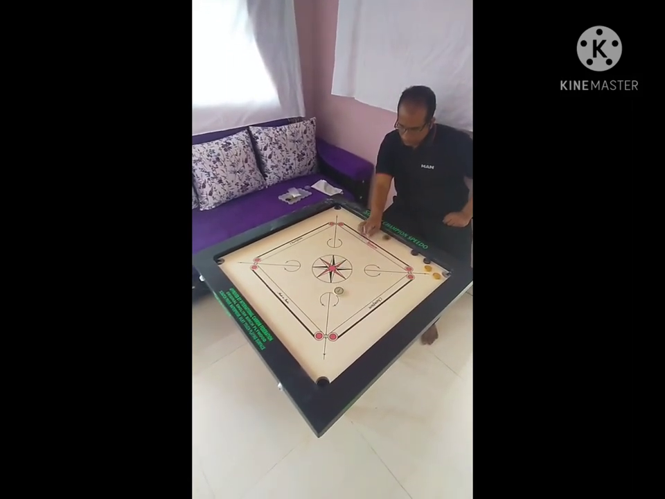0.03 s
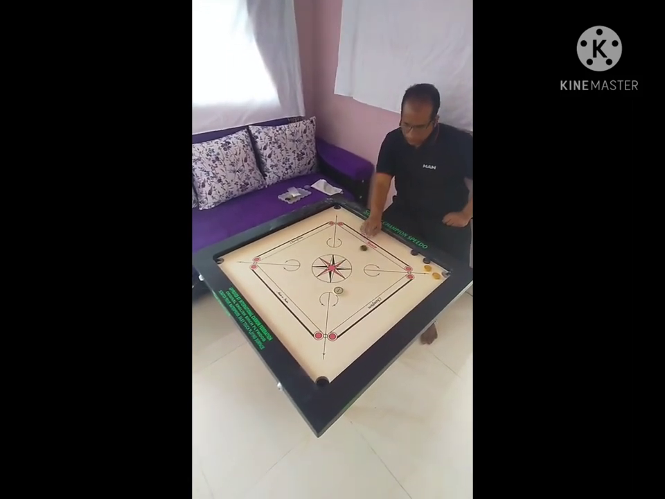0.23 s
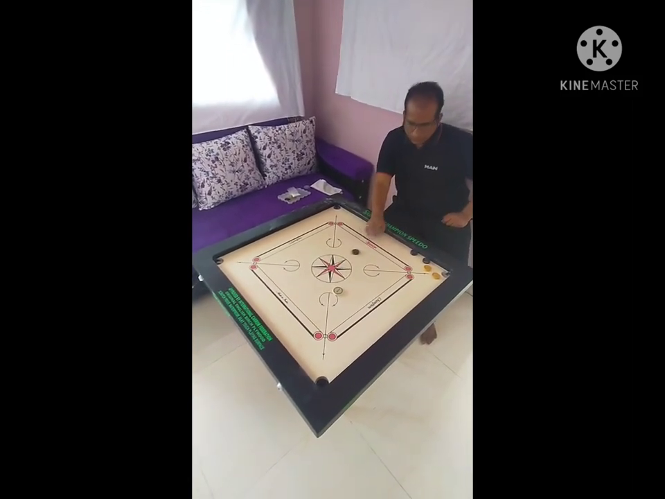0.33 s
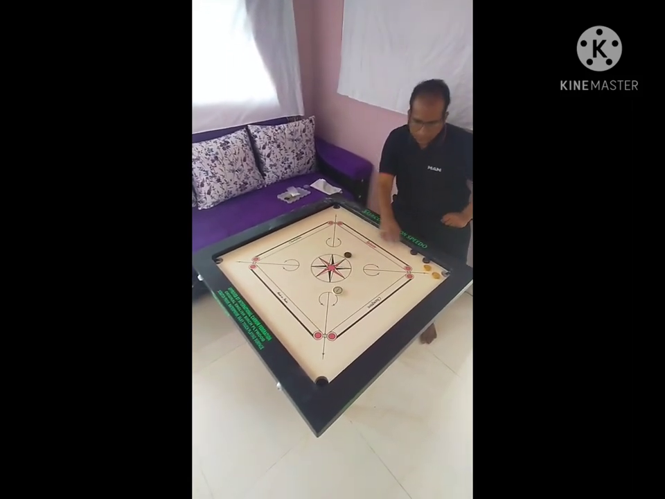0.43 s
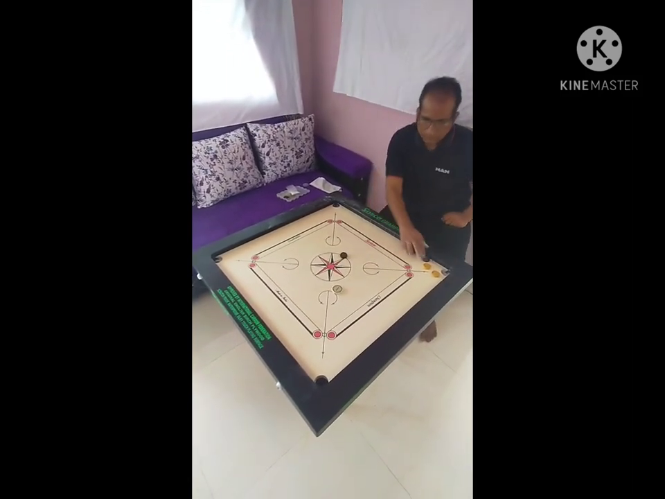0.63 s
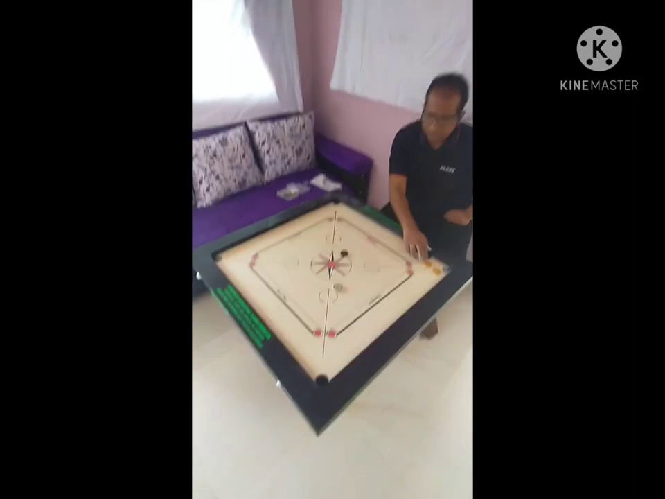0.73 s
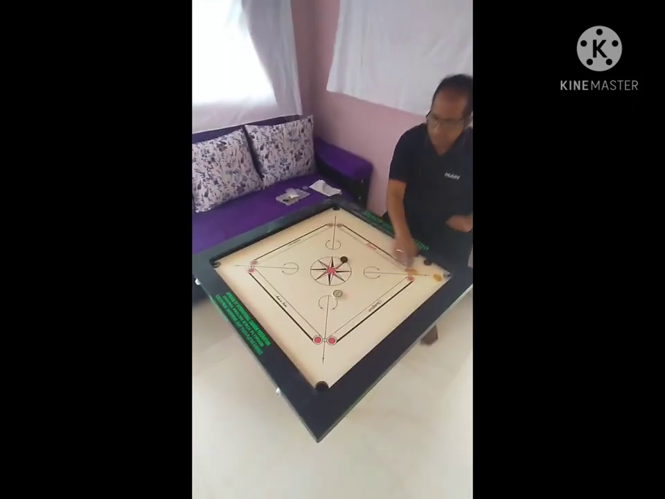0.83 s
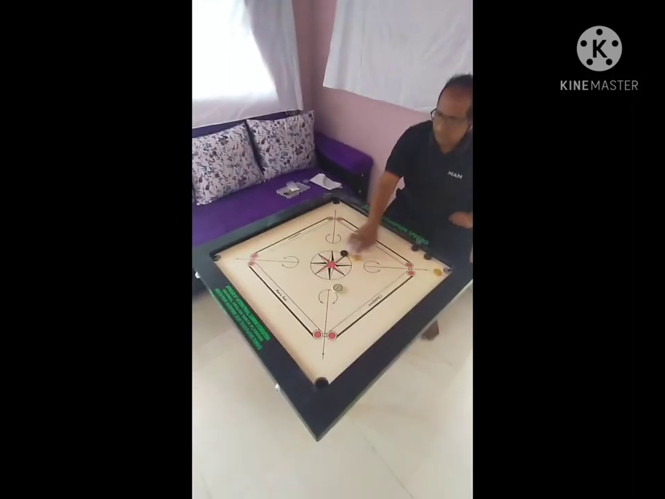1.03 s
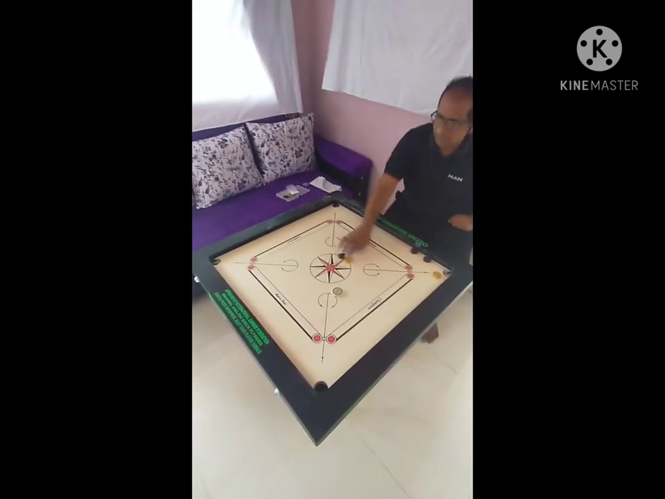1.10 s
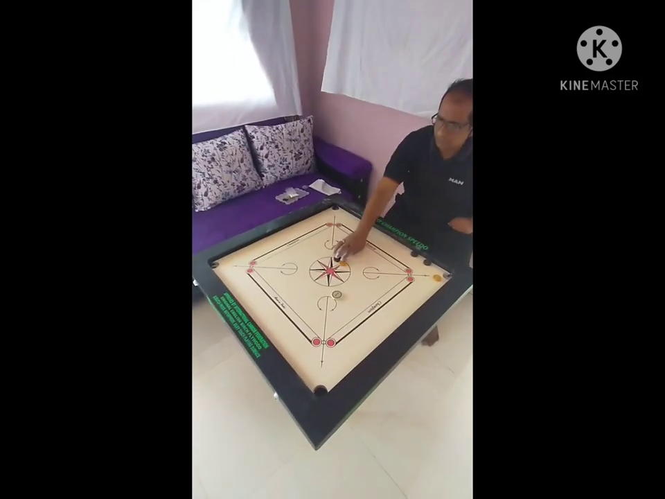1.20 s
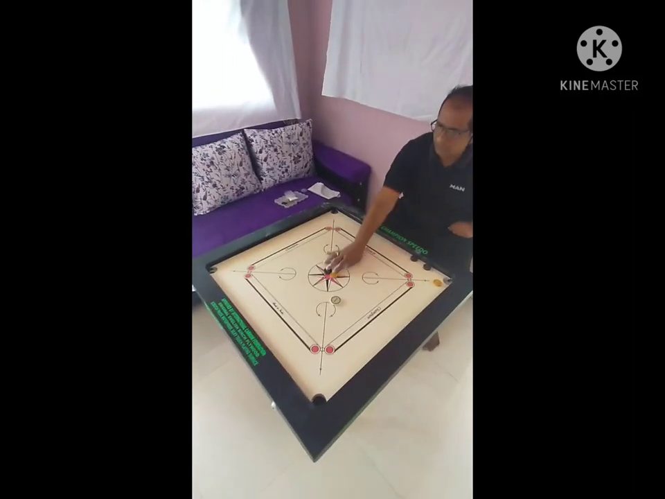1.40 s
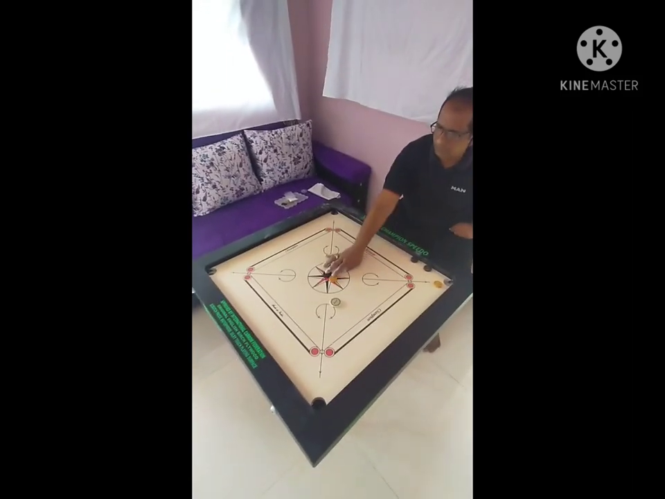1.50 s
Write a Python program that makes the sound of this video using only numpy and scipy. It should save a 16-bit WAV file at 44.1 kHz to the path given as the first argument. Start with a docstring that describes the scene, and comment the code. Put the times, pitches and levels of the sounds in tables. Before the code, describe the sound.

Sharp clacks and three woody knocks as a flicked striker rebounds around a carrom board.

```python
"""A striker, flicked across a wooden carrom board, rebounds from the frame three times.
Each impact excites the damped modes of frame and bed. Discs collide with bright clacks, tap the
plywood bed and hiss by sliding friction; soft pushes make the board thud, and at the end a hand
comes down on a piece. A small hard-walled room reverberates. Heard in mono from a step away."""
import sys
import numpy as np
from scipy import signal
from scipy.fft import rfft, irfft
from scipy.io import wavfile
from scipy.ndimage import uniform_filter1d

SR = 44100
rng = np.random.default_rng(int(sys.argv[2]) if len(sys.argv) > 2 else 0)


def dump(signal):
    """Clip the signal to [-1, 1] and save it as 16-bit WAV at the path in sys.argv[1]."""
    limited = np.clip(np.atleast_2d(signal).T, -1, 1)
    pcm = np.round(limited * 32767).astype(np.int16)
    wavfile.write(sys.argv[1], SR, pcm)


N = 68355
T = np.arange(N) / SR
HZ = np.maximum(np.arange(N + 1) * SR / (2 * N), 1)   # frequency grid
BODY_HZ = 1114   # upper edge of the wood's low body


def frame_knocks():
    """Impact excitation: the striker gives a woody blow, a crack and a quick rebound; modes ring on."""
    # Each row: start in seconds, level in dB, rebound delay in seconds, rebound in dB, favoured band in
    # Hz, body, crack and ringing in dB, decay time factor, favoured ring in Hz, room in dB.
    knocks = [(0.3903, 7, 0.0025, 2, 2180, -2, -13.5, 2, 1.05, 1420, 5),
              (0.5908, -0.5, 0.002994, 5.5, 2800, -5.5, -13, 1, 1.23, 794, 6.5),
              (0.8219, 5, 0.0023, -3, 1570, -1.5, -17, 3.5, 0.65, 965, 7)]
    # The woody blow as heard. Each row: frequency in Hz, relative level in dB.
    wood_spectrum = [(40, -61), (120, -15), (300, -17.5), (550, -17), (800, -10), (1100, -6.5), (1320, 3.5),
                     (1600, -1), (2000, -0.5), (2450, -1.5), (2850, -5), (3400, -5.5), (4000, -27.5),
                     (6000, -40.5), (16000, -79)]
    # The crack as heard, with the microphone's lift near 15 kHz. Each row: frequency in Hz, level in dB.
    crack_spectrum = [(500, -4), (3000, 3), (5000, -1), (6500, -4), (8300, -1.5), (9800, -11),
                      (11500, -13.5), (13300, -24), (15400, -19), (17000, -50)]
    favour_db, modes_db = 2, -9.5
    out = np.zeros(N)
    for (start, db, rebound_s, rebound_db, favoured_hz, body_db, crack_db,
         ringing_db, decay_factor, ring_hz, room_db) in knocks:
        colour = favour_db * favoured_band(HZ, favoured_hz) + body_db * (HZ < BODY_HZ)
        wood = click(at_hz(wood_spectrum) + colour)
        crack = from_db(crack_db) * click(at_hz(crack_spectrum))
        blow = wood + through_board(crack)
        rebound = from_db(rebound_db)
        contacts = blow + rebound * delayed(blow, rebound_s)
        room = reflections(wood + crack, room_db)
        ringing = from_db(modes_db + ringing_db) * board_ring(decay_factor, ring_hz)
        aftersound = np.hypot(1, rebound) * (room + ringing)   # the two contacts add in energy
        out += from_db(db) * delayed(contacts + aftersound, start)
    return out


def board_ring(decay_factor, favoured_hz):
    """Modal superposition: each knock favours some modes and has its own ring length."""
    # Modes of frame and bed. Each row: frequency in Hz, relative level in dB, base t60 in seconds.
    modes = [(487, -15.5, 0.5), (670.5, -5.5, 0.36), (757.3, -14.5, 1), (862.5, -9.5, 0.36),
             (930.5, -10.5, 0.33), (1057, -9.5, 0.55), (1150, -19, 0.52), (1218, 0.5, 0.31),
             (1225, -14.5, 0.25), (1434, -4.5, 0.1), (1446, 2.5, 0.37), (1696, -6, 0.53), (1782, -3, 0.1),
             (1931, -7.5, 0.53), (2010, -1.5, 0.39), (2090, -3.5, 0.45), (2240, -6.5, 0.35),
             (2516, -0.5, 0.067), (2690, -14, 0.13), (3285, -15, 0.67)]
    favour_db, swell_cycles = 3, 9.6
    out = np.zeros(N)
    for k, (hz, db, t60) in enumerate(modes):
        gain = from_db(db + favour_db * favoured_band(hz, favoured_hz) + rng.normal(scale=1))
        swell = 1 - np.exp(-T * hz / swell_cycles)   # low modes take longer to build up
        out += (-1) ** k * gain * unit(swell * ring(hz, t60 * decay_factor))
    return out


def favoured_band(hz, centre_hz, width_octaves=0.17):
    """Selective excitation: each knock favours one band, a bell curve in log frequency."""
    return np.exp(-(np.log2(hz / centre_hz) / width_octaves) ** 2)


def through_board(contact, decay_s=0.0034, spread_db=3.5):
    """Multiple reflection: waves running to and fro in the board smear a contact over milliseconds."""
    t = T[:SR // 40]
    response = unit(rng.standard_normal(len(t)) * np.exp(-t / decay_s))
    spread = from_db(spread_db)
    return (contact + spread * signal.fftconvolve(contact, response)[:N]) / np.hypot(1, spread)


def disc_clacks():
    """Hard collision: discs meet with a bright click, thinner when glancing, and a short high ring."""
    # Each row: start in seconds, level in dB, thinning corner in Hz, ring frequency in Hz,
    # ring level in dB, ring t60 in seconds, the click's room level in dB.
    clacks = [(0.15, -26, 7700, 8200, -4.5, 0.0043, -5), (0.2255, -16, 5400, 6600, 8.5, 0.006, -11),
              (0.2279, -5.5, 3430, 7740, -2, 0.014, 6.5), (0.2334, -1, 3500, 10750, -16.5, 0.058, 2),
              (0.3141, -11, 3500, 9150, -11, 0.017, 2.5), (0.387, -25, 4070, 6500, -11, 0.0067, 10),
              (0.3916, -16, 4570, 5070, 9.5, 0.0071, 21.5), (0.3929, -12.5, 7100, 8050, 8, 0.0041, 13.5),
              (0.7852, -17.5, 5960, 8550, 9.5, 0.016, 9), (0.7966, -10.5, 5570, 8720, 4, 0.025, 13),
              (0.822, -1, 3500, 6060, -21, .005, -3.5)]
    # The click as heard, with the microphone's lift near 15 kHz. Each row: frequency in Hz, level in dB.
    click_spectrum = [(400, -5), (2000, 14), (3600, 8), (4600, -0.5), (6500, 3.5), (8500, 3), (9800, -4),
                      (12500, -18.5), (15400, -8.5), (17000, 3)]
    thinning_db_per_octave = 23
    out = np.zeros(N)
    for start, db, thin_hz, ring_hz, ring_db, t60, room_db in clacks:
        thinning = thinning_db_per_octave * np.log2(np.clip(HZ / thin_hz, .1, 1))
        contact = click(at_hz(click_spectrum) + thinning)
        clack = through_board(contact) + reflections(contact, room_db)
        ping = from_db(ring_db) * ring(ring_hz, t60)
        out += from_db(db) * delayed(clack + ping + reflections(ping, room_db=-1.5), start)
    return out


def bed_taps():
    """Contact low-pass filtering: discs tap the plywood bed, and a soft touch loses its treble."""
    # Each row: start in seconds, level in dB, tilt in dB per octave, softening corner in Hz, room in dB.
    taps = [(0.1480, -8, -2.5, 2520, 3), (0.2271, 2, -0.5, 8000, 1), (0.2332, 0.5, 1.5, 7940, -3),
            (0.2754, 0, 7.5, 1610, 0.5), (0.3139, -3, 2.5, 3780, 2), (0.4620, 2.5, 9.5, 1520, -7),
            (0.471, 0.5, 9, 1470, -0.5), (0.786, -15, 2, 3000, 6.5), (1.083, -32.5, 5.5, 2560, 13),
            (1.3642, -19, 4.5, 4900, 9), (1.3744, -11.5, -6.5, 4030, 2)]
    # A tap on the bed as heard. Each row: frequency in Hz, relative level in dB.
    bed_spectrum = [(100, -12), (300, -1.5), (700, 3.5), (1050, 5.5), (1400, 9.5), (1750, 3), (2400, 3.5),
                    (3300, -5), (4200, -23), (8000, -15), (13000, -32.5), (16000, -41)]
    softening_db_per_octave = -7.5
    out = np.zeros(N)
    for start, db, slope, soft_hz, room_db in taps:
        tilt = slope * np.log2(np.maximum(HZ / BODY_HZ, .5))
        softening = softening_db_per_octave * np.log2(np.maximum(HZ / soft_hz, 1))
        contact = click(at_hz(bed_spectrum) + tilt + softening)
        out += from_db(db) * delayed(through_board(contact) + reflections(contact, room_db), start)
    return out


def board_thuds(attack_s=.005):
    """Damped free vibration: soft pushes set the whole board and its stand booming briefly."""
    # Each row: start in seconds, level in dB, frequency in Hz, t60 in seconds.
    thuds = [(0.000, -14, 122, 0.031), (0.17, -6, 103, 0.041), (0.242, -0.5, 148.6, 0.14),
             (0.284, -1, 142, .2), (0.307, -11, 83, 0.19), (0.496, -5, 124.6, 0.11),
             (0.545, -4.5, 92.5, 0.14), (0.600, -8, 99, 0.12), (0.672, 3, 118, 0.029),
             (0.717, -6, 117, 0.13), (0.762, -8.5, 97, 0.074), (0.893, -8.5, 117, 0.094),
             (1.084, -13.5, 105, 0.05), (1.236, -18, 90, 0.13), (1.279, -15, 118, 0.059),
             (1.362, -6.5, 157, 0.046), (1.404, -11, 96, 0.048), (1.457, -10, 114, 0.023),
             (1.526, -12, 155, 0.095)]
    swell = 1 - np.exp(-T / attack_s)
    out = np.zeros(N)
    for start, db, hz, t60 in thuds:
        boom = unit(swell * ring(hz, t60))
        out += from_db(db) * delayed(boom + reflections(boom, room_db=-5), start)
    return out


def sliding(sing_hz=8960, bandwidth_hz=160, sing_db=-11):
    """Friction noise: discs and hand hiss on the powdered bed, and a disc resonance sings faintly."""
    # Envelope of the sliding. Each row: time in seconds, level in dB.
    levels = [(0, -70), (0.2, -70), (0.3, -51), (0.75, -52), (0.95, -70), (1.06, -68), (1.12, -61.5),
              (1.35, -61.5), (1.43, -60.5), (1.55, -51)]
    # The hiss as heard, with the microphone's lift near 15 kHz.
    # Each row: frequency in Hz, relative spectral density in dB.
    hiss_spectrum = [(500, 19), (3000, 5), (4500, -6), (6200, -2.5), (8000, 4), (9000, -1), (9800, 2),
                     (11500, 0), (13000, -11), (15300, 7), (17000, -23)]
    resonance = signal.iirpeak(sing_hz, sing_hz / bandwidth_hz, fs=SR)
    singing = signal.lfilter(*resonance, rng.standard_normal(N))
    envelope = from_db(np.interp(T, *np.transpose(levels)))
    return envelope * (noise(hiss_spectrum) + from_db(sing_db) * singing / singing.std())


def reflections(x, room_db, gap_s=0.00083, build_s=.005):
    """Reverberation: convolution with a fresh, uneven noise tail that dies away band by band."""
    # Decay of the room. Each row: band centre in Hz, t60 in seconds.
    decays = [(120, 0.43), (500, 0.36), (1400, .32), (2800, 0.27), (5500, .32), (9000, 0.27), (15000, 0.27)]
    size = SR // 2
    t, hz = T[:size], np.maximum(np.fft.rfftfreq(size, 1 / SR), 1)
    white = rfft(rng.standard_normal(size))
    centres, t60s = np.transpose(decays)
    tail = np.zeros(size)
    for share, t60 in zip(np.eye(len(centres)), t60s):
        band = irfft(white * at_hz(list(zip(centres, share)), hz), size)
        tail += band * np.exp(-np.log(1000) * t / t60)
    clumps = uniform_filter1d(rng.standard_normal(size), size=90)
    unevenness = from_db(clumps / clumps.std())   # 1 dB rms
    build_up = 1 - np.exp(-np.maximum(t - gap_s, 0) / build_s)
    return from_db(room_db) * signal.fftconvolve(x, unit(tail * unevenness * build_up))[:N]


def room_noise(level_db=-46.5):
    """Stationary noise: a faint, low background fills the room."""
    # Each row: frequency in Hz, relative spectral density in dB.
    room_spectrum = [(25, -32), (50, -11), (90, -0.5), (160, 4), (300, 3.5), (700, -3.5), (1300, -7.5),
                     (2300, -16), (3200, -20), (4300, -43), (6000, -27.5), (9000, -50), (12800, -50),
                     (15300, -28)]
    return from_db(level_db) * noise(room_spectrum)


def click(db):
    """Minimum phase: the shortest causal click with this spectral shape, at unit energy."""
    cepstrum = irfft(db * np.log(10) / 20)[:N]
    cepstrum[0] = 0
    return unit(irfft(np.exp(rfft(2 * cepstrum, 2 * N)))[:N])


def ring(hz, t60):
    """Damped oscillator: a sine of unit energy that falls 60 dB in t60 seconds."""
    return unit(np.sin(2 * np.pi * hz * T) * np.exp(-np.log(1000) * T / t60))


def noise(spectrum):
    """Spectral shaping: white noise takes on this colour, at an rms of one."""
    white = rfft(rng.standard_normal(2 * N))
    coloured = irfft(white * from_db(at_hz(spectrum)))[:N]
    return coloured / coloured.std()


def at_hz(points, hz=HZ):
    """Linear interpolation of a table on a log-frequency axis."""
    frequencies, values = np.transpose(points)
    return np.interp(np.log(hz), np.log(frequencies), values)


def delayed(x, seconds):
    """Time shift: the same sound, later."""
    return np.pad(x, (int(seconds * SR), 0))[:N]


def from_db(db):
    """Decibels as an amplitude ratio."""
    return 10 ** (np.asarray(db) / 20)


def unit(x):
    """Normalisation to an energy of one."""
    return x / np.sqrt(np.sum(x ** 2) + 1e-20)


def scene():
    """Superposition: all sources add, the same in both channels."""
    mono = frame_knocks() + disc_clacks() + bed_taps() + board_thuds() + sliding() + room_noise()
    return np.array([mono, mono])


def record(dry, low_cut_hz=80, high_cut_hz=15600):
    """Band limiting and saturation: a small microphone loses deep bass, rounds peaks and cuts the top."""
    thin = signal.sosfilt(signal.butter(3, low_cut_hz, "high", fs=SR, output="sos"), dry)
    rounded = 0.94 * np.tanh(thin / 0.82)
    return signal.sosfilt(signal.ellip(12, .2, 70, high_cut_hz, fs=SR, output="sos"), rounded)


dry = scene()
out = record(dry)
dump(out)
```